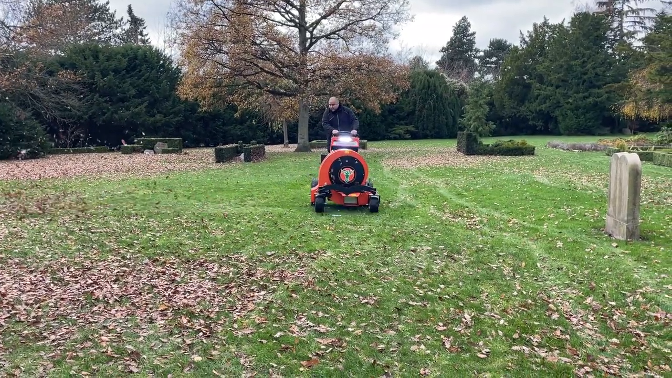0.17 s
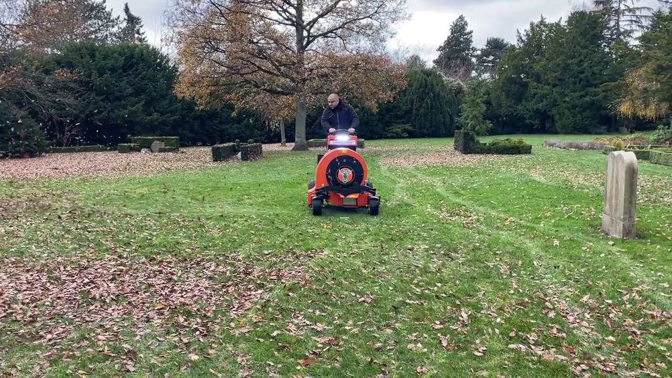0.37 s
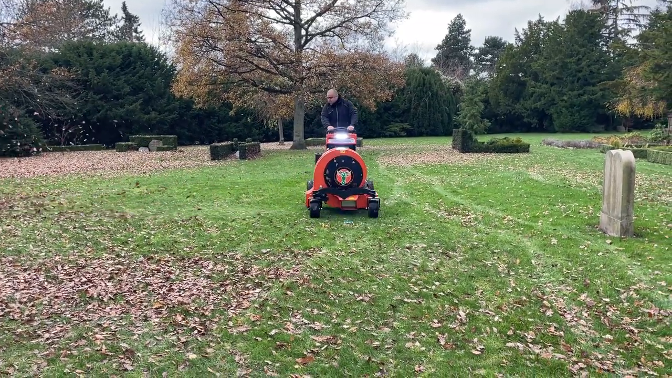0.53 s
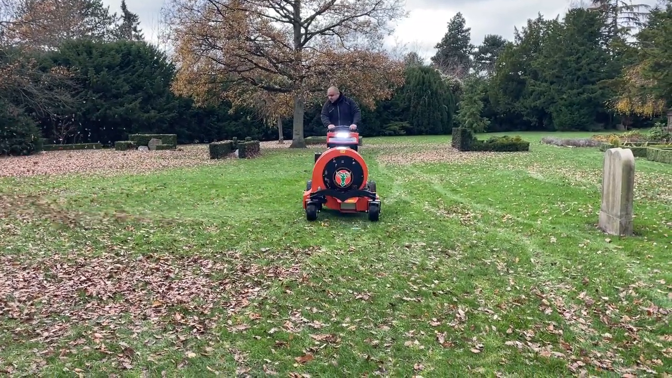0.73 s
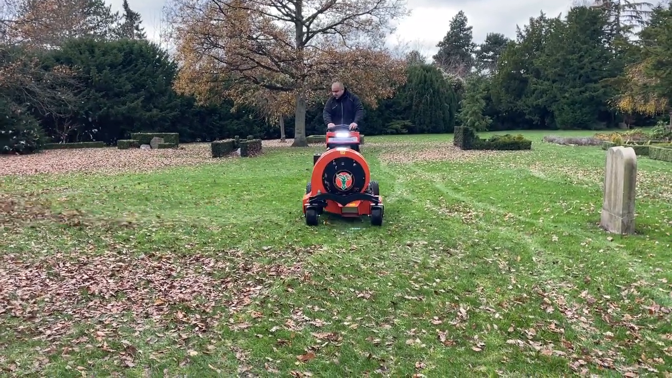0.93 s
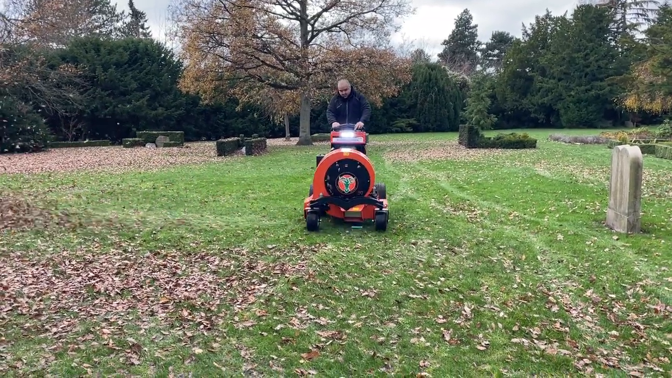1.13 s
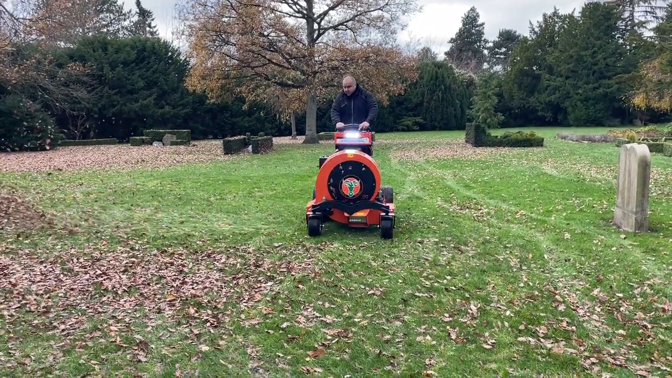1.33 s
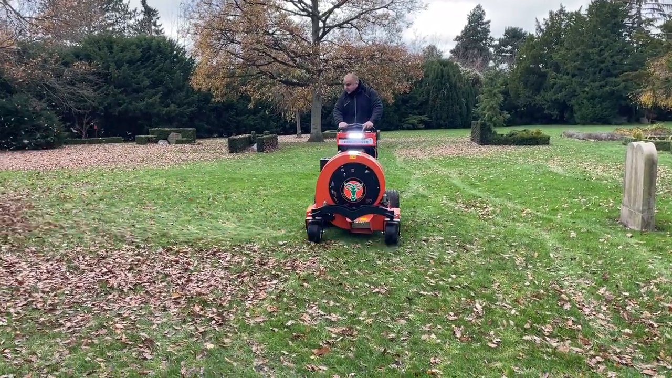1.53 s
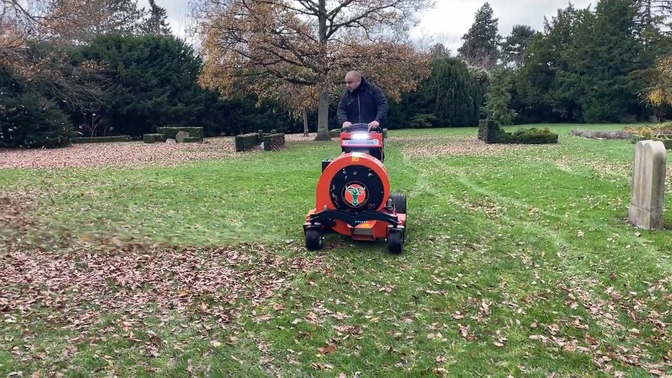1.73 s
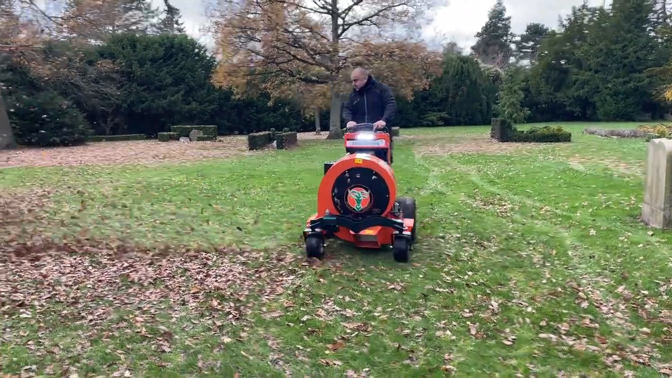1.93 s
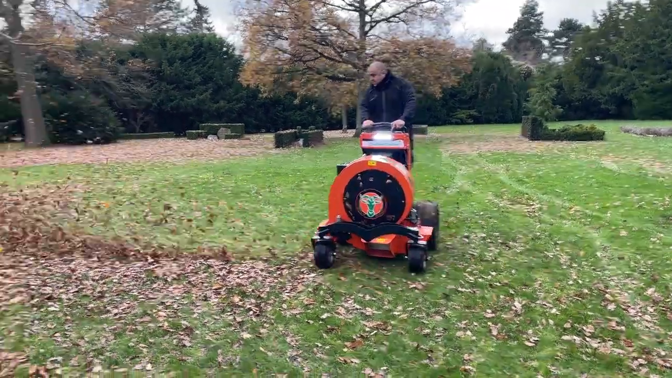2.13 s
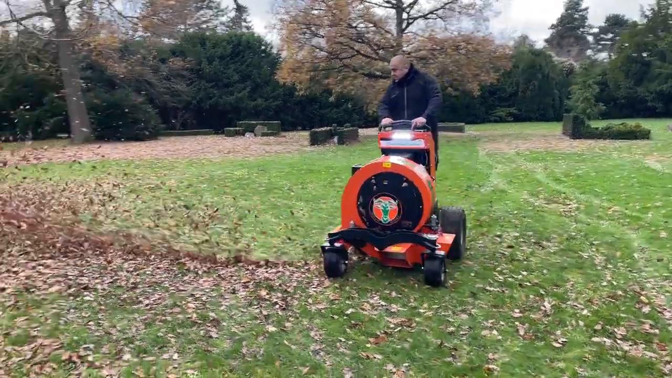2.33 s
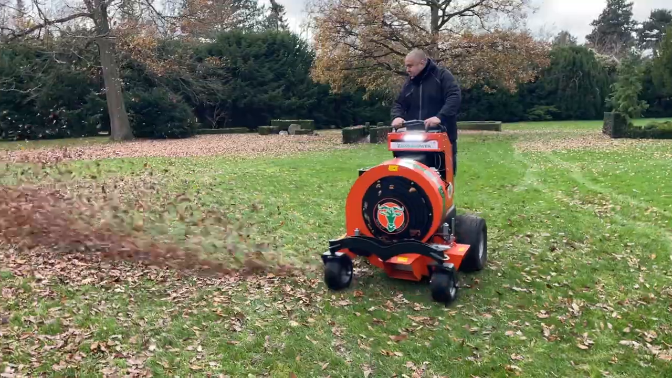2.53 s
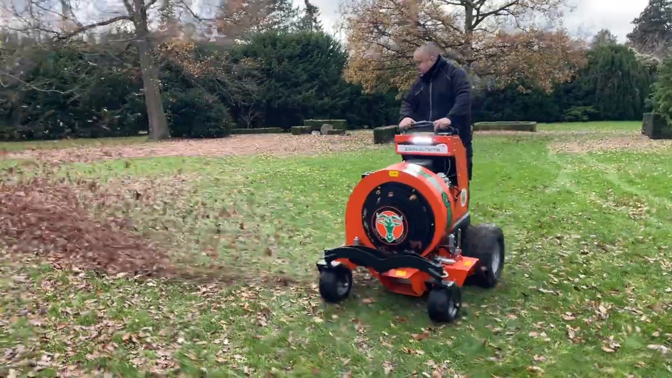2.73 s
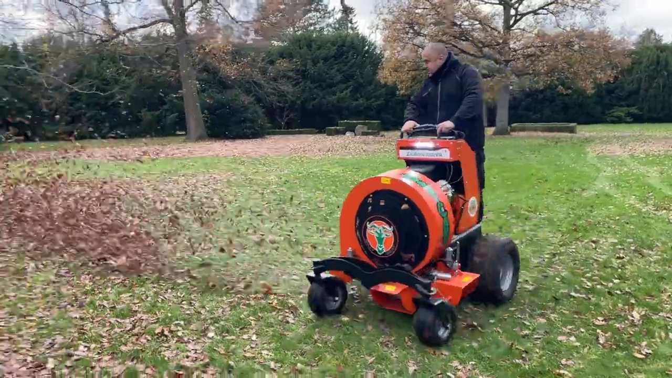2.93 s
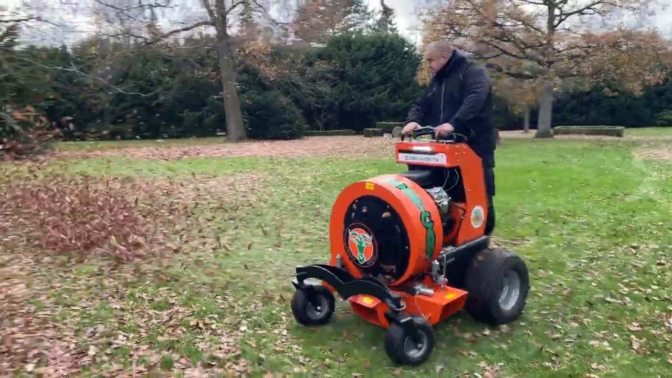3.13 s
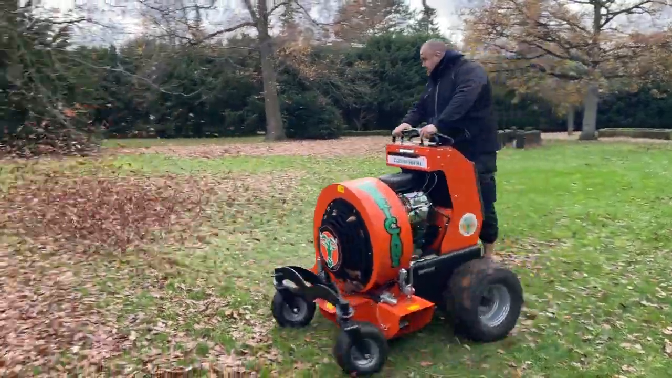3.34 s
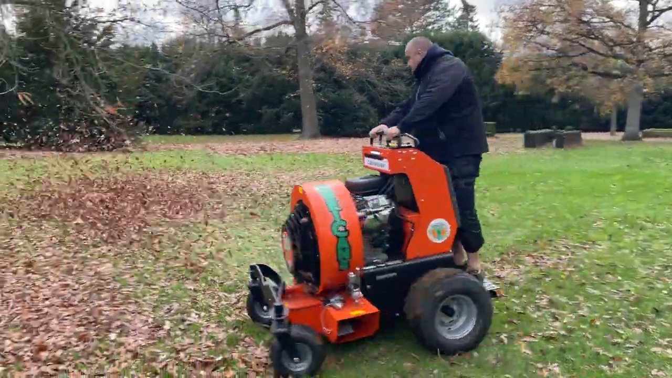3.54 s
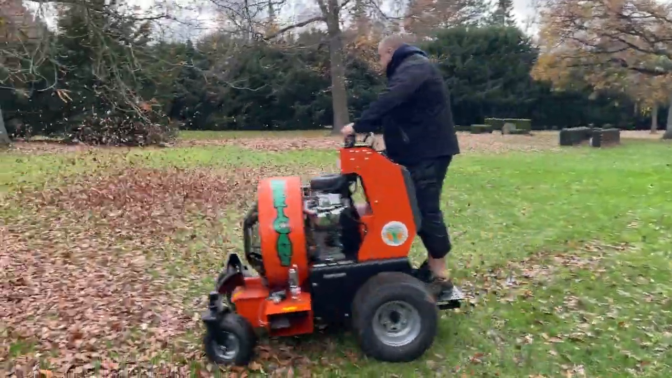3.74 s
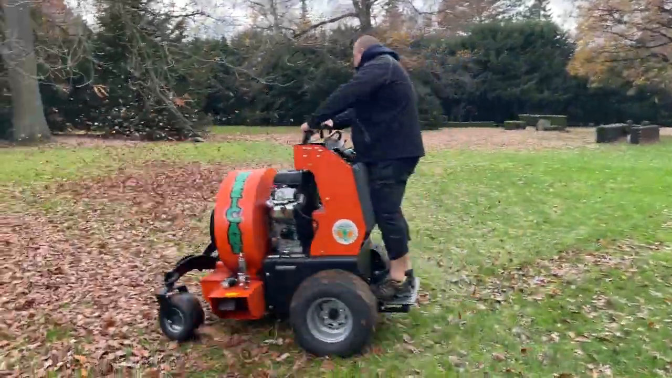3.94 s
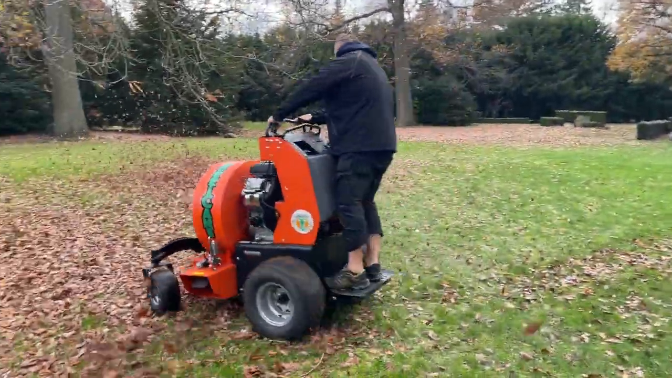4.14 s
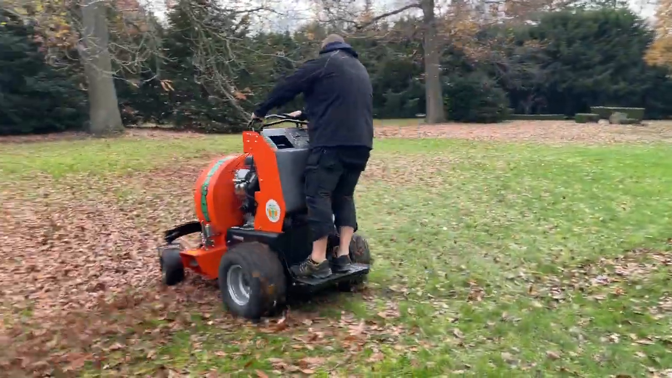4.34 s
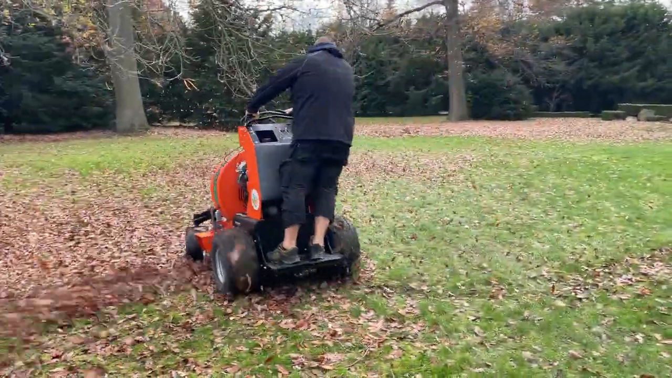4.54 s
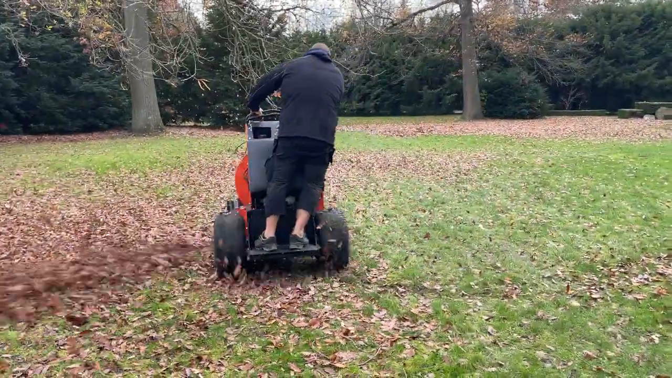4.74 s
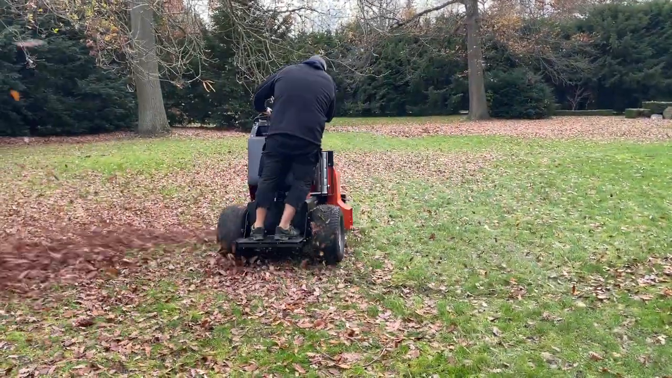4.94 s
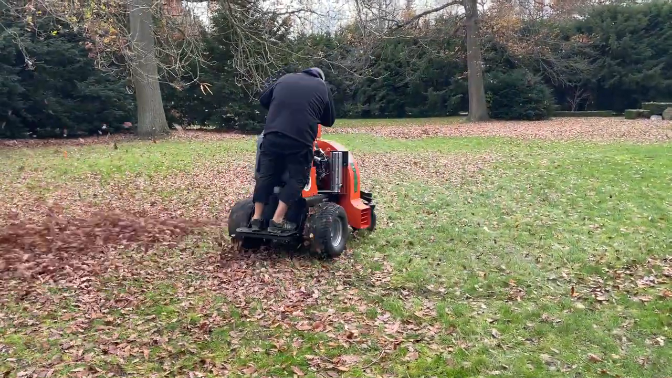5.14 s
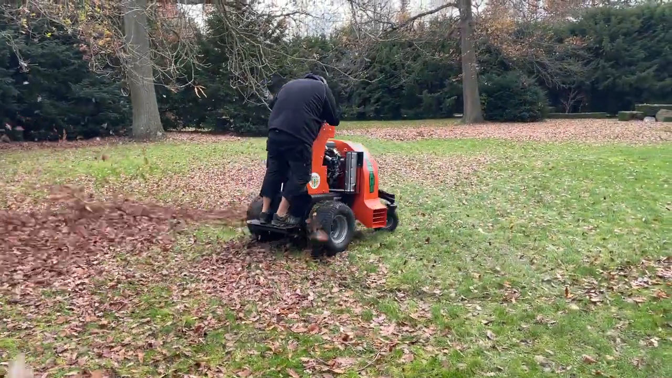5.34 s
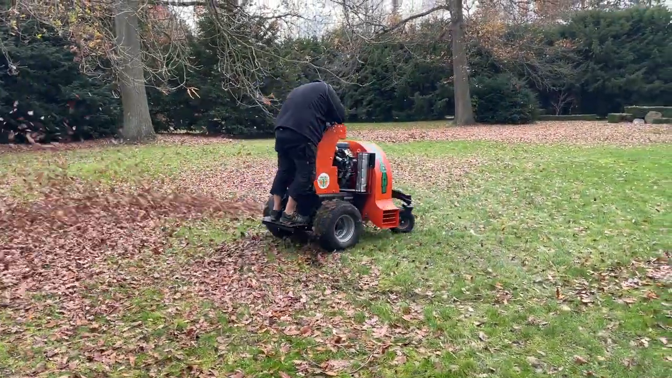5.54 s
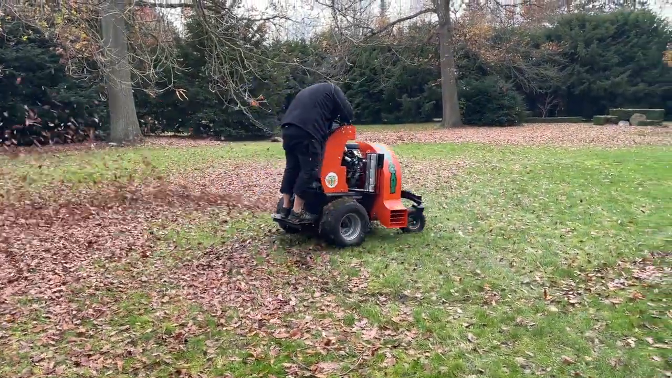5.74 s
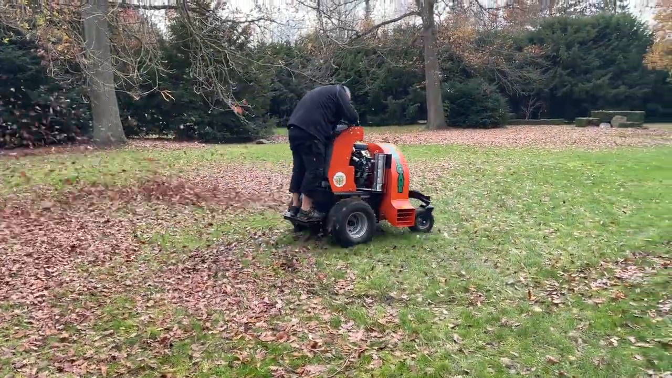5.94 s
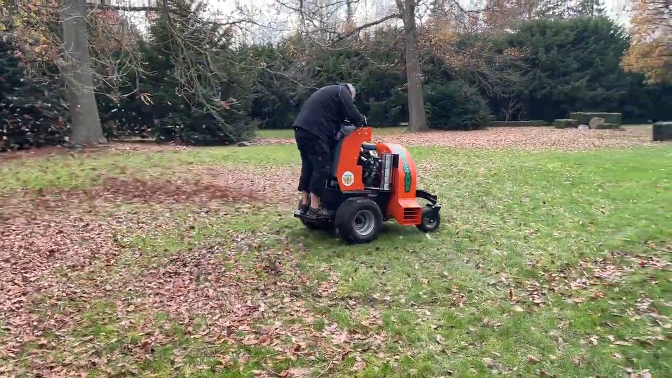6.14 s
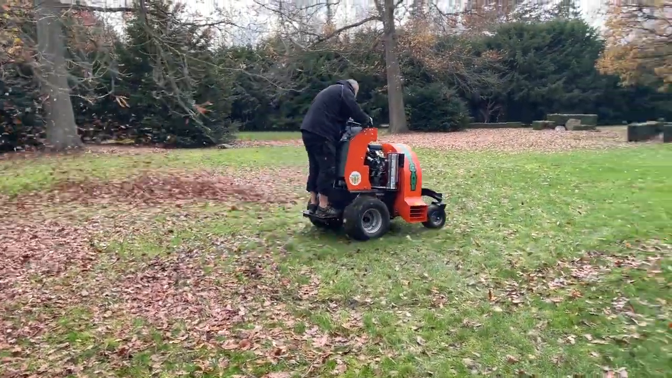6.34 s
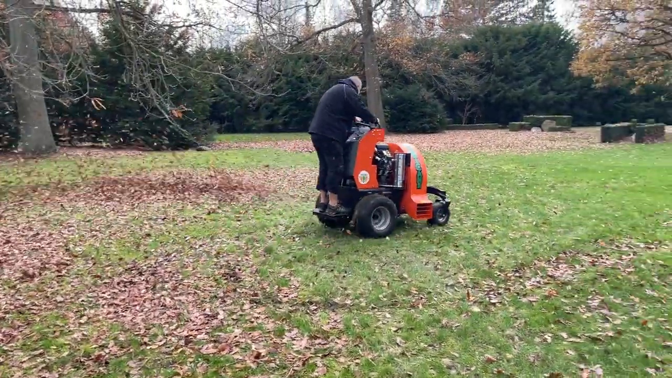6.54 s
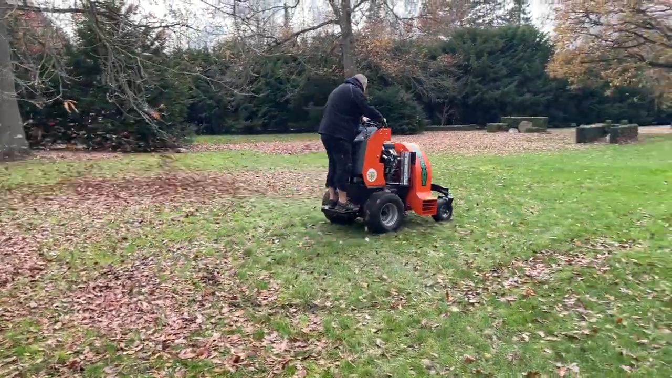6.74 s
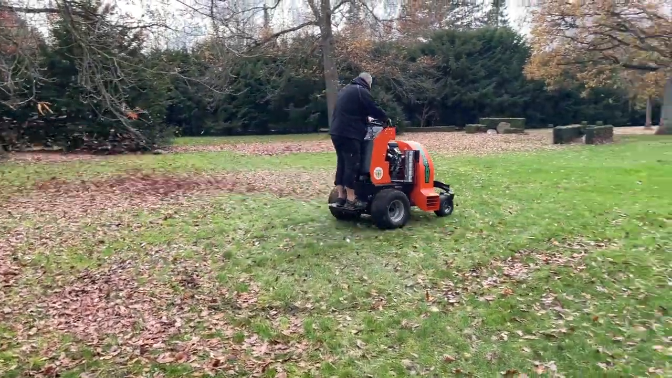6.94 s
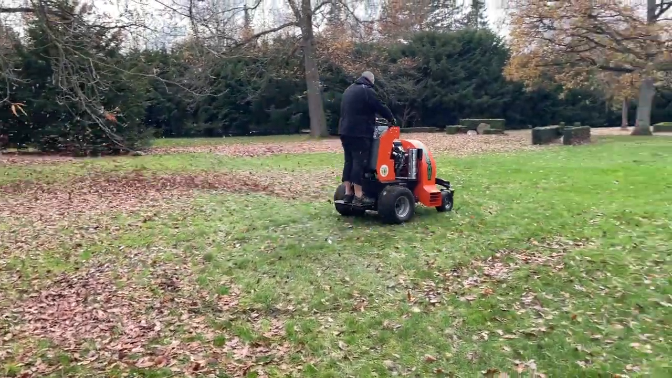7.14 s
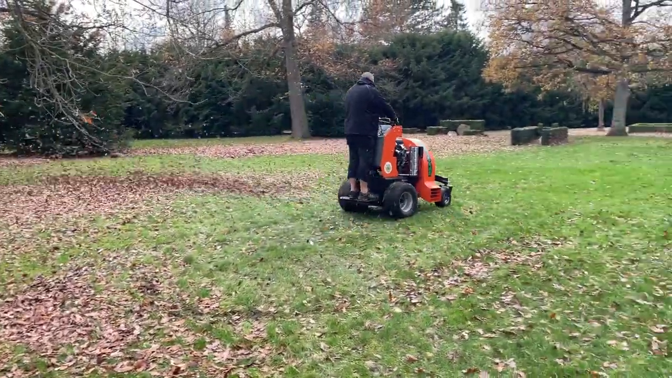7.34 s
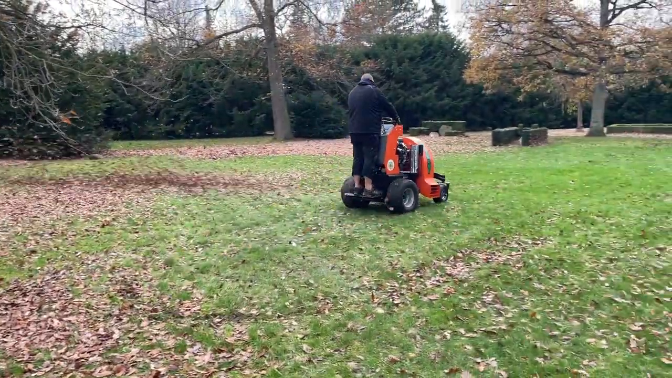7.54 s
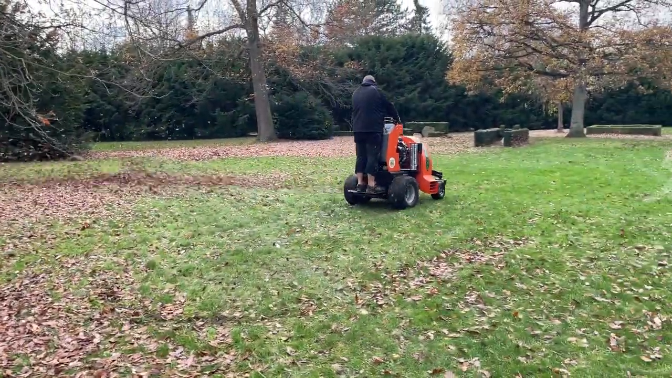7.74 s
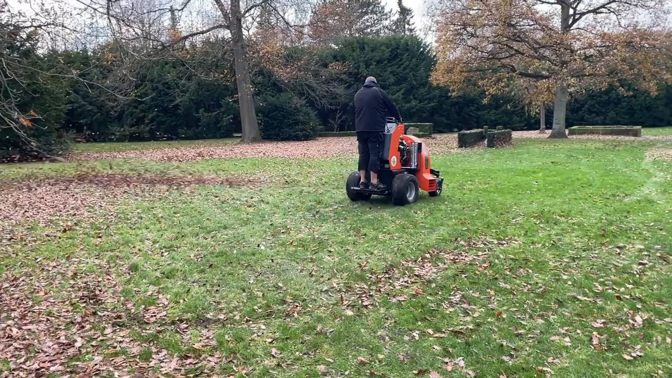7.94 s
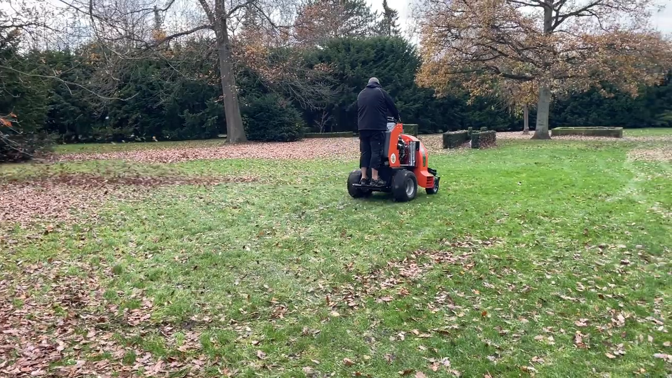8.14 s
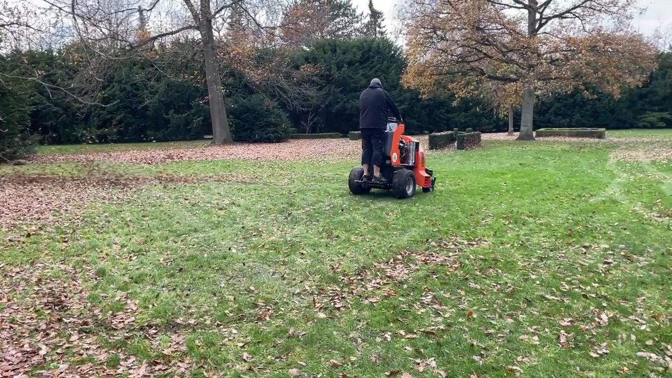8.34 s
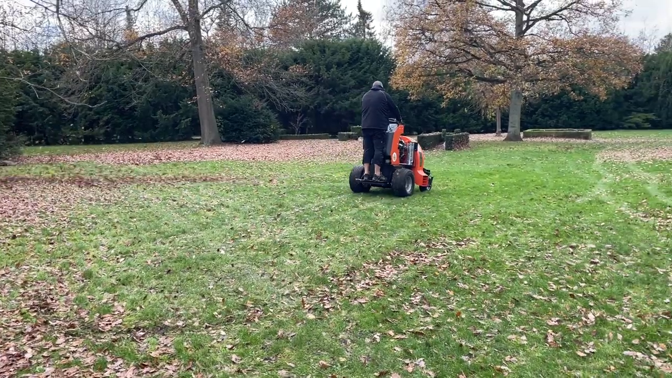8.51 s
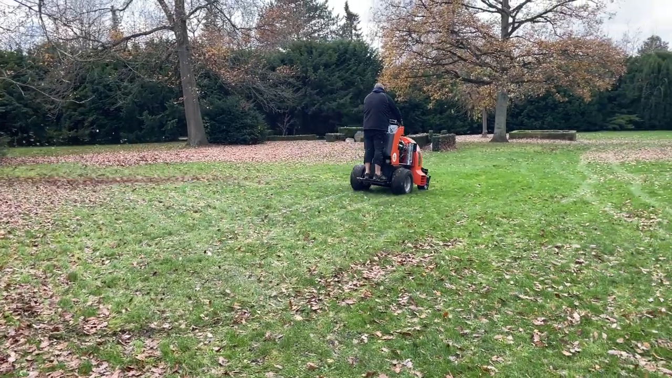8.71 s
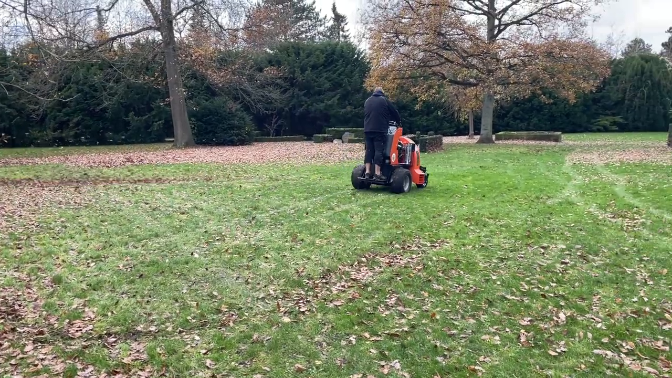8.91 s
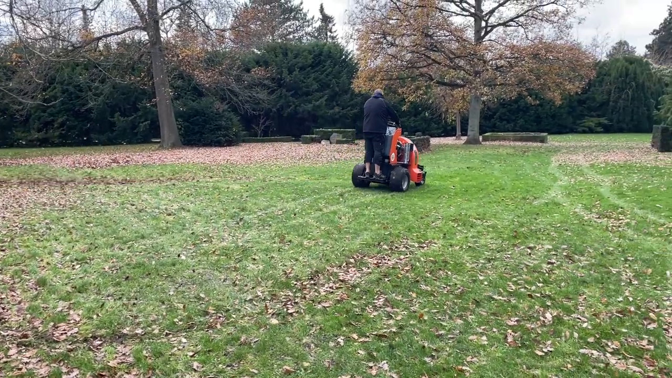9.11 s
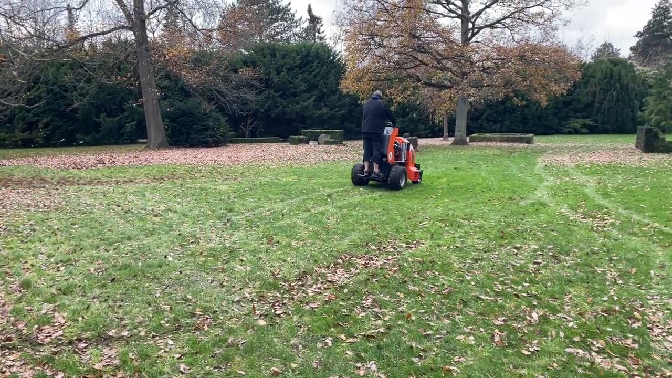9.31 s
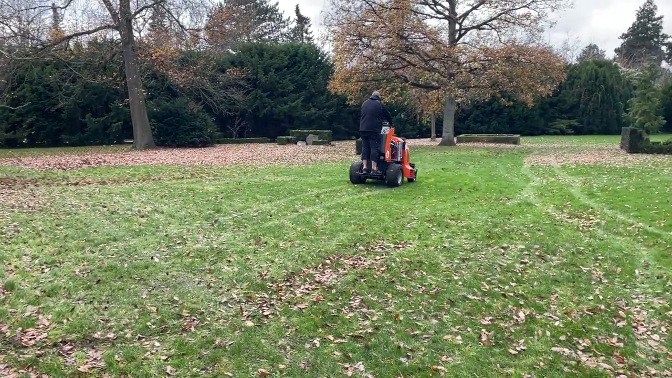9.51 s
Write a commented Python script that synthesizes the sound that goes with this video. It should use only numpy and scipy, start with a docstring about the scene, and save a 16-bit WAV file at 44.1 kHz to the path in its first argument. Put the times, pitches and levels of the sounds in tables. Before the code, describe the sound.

A two-cylinder engine and large fan run continuously. First comes a dense, loud intake rush with faint whistling and mechanical clatter, then a strong tonal hum around three seconds as the machine swings past nearby. The blast drops, and from behind the sound becomes drier, puttering and raspy, slowly receding. Dry leaf rustle and faint low wind gusts sit beneath, heard from a few metres away on an open lawn in stereo.

```python
"""On a lawn, a stand-on leaf blower with a two-cylinder petrol engine comes near, turns and drives off.
From the front, shaped noise makes the fan intake roar over clacking valve gear; side-on, the blade tone
(a sum of cosines) swells while the engine sags. From behind, the exhaust chops the noise into spits and
knocks the tailpipe twice per engine cycle. Ringing filters make narrow bands of noise, whistling or dull;
tiny ticks make blown leaves rustle, and low noise makes a little wind at the microphone."""
import sys
import numpy as np
from scipy import signal
from scipy.fft import rfft, irfft, next_fast_len
from scipy.io import wavfile

SR = 44100
rng = np.random.default_rng(int(sys.argv[2]) if len(sys.argv) > 2 else 0)


def dump(signal):
    """Clip the signal to [-1, 1] and save it as 16-bit WAV at the path in sys.argv[1]."""
    limited = np.clip(np.atleast_2d(signal).T, -1, 1)
    pcm = np.round(limited * 32767).astype(np.int16)
    wavfile.write(sys.argv[1], SR, pcm)


N = 426447
TIME = np.arange(N) / SR
SIZE = next_fast_len(N)
HZ = np.maximum(np.arange(SIZE // 2 + 1) * SR / SIZE, 1)


def from_db(db):
    """Decibels to gain."""
    return np.exp(np.asarray(db) * (np.log(10) / 20))


def rms_one(x):
    """Scale to an average strength (rms) of 1."""
    return x / np.sqrt(np.mean(x ** 2) + 1e-20)


def in_time(rows):
    """Draw each column of a time table as a curve, sample by sample."""
    seconds, *columns = np.transpose(rows)
    return [np.interp(TIME, seconds, column) for column in columns]


def at_hz(points):
    """Draw a frequency table as a curve over the whole spectrum."""
    hz, value = np.transpose(points)
    return np.interp(np.log(HZ), np.log(hz), value)


def drift(rate_hz):
    """Slow random wandering with spread 1, changing about rate_hz times a second."""
    step = 40  # samples between computed points
    r = np.exp(-2 * np.pi * step * rate_hz / SR)
    settle = 2000  # the filter's start-up is thrown away
    noise = rng.standard_normal(N // step + settle + 2)
    slow = signal.lfilter([1], [1, -2 * r, r * r], noise)[settle:]
    return np.interp(np.arange(N) / step, np.arange(len(slow)), rms_one(slow))


def band_pass(x, order, low_hz, high_hz):
    """Keep only the sound between two frequencies."""
    return signal.sosfilt(signal.butter(order, [low_hz, high_hz], "band", fs=SR, output="sos"), x)


def swell(centre_s, half_s):
    """A smooth rise to 1 and fall, as something sweeps past."""
    return np.exp(-np.minimum(((TIME - centre_s) / half_s) ** 2, 20))


def stretch(start_s, end_s, fade_s=0.28):
    """1 while a sound is heard for a stretch, fading at both ends."""
    return np.clip(np.minimum(TIME - start_s, end_s - TIME) / fade_s + .5, 0, 1)


def panned(x, db):
    """Place a sound between the ears by left minus right dB."""
    return x * from_db(db * np.array([[.5], [-.5]]))


def resonator(hz, width_hz):
    """Filter coefficients of one resonance, gain 1 at its peak."""
    r = np.exp(-np.pi * width_hz / SR)
    return (1 - r * r) / 2 * np.array([1, 0, -1]), [1, -2 * r * np.cos(2 * np.pi * hz / SR), r * r]


def pulse_ages(cycles, moment, db, uneven_db):
    """Time since the latest pulse [engine cycles] and its strength, which differs from pulse to pulse."""
    count, age = np.divmod(cycles - moment + 1, 1)
    chance = np.clip(rng.standard_normal(int(count[-1]) + 1), -2, 2)
    return age, from_db(db + uneven_db * chance)[count.astype(int)]


# Shared strength of the air noise and parts tied to it: (time [s], level [dB])
AIR_STRENGTH = [(0, -24), (1.9, -23.5), (2.35, -22.5), (2.95, -22.5), (3.2, -26), (3.55, -26),
                (3.75, -30.5), (4.1, -29), (4.6, -34.5), (5.0, -30), (6.7, -30.5), (7.8, -32.5),
                (9.67, -35.5)]
# How far away the machine is: (time [s], distance [m])
DISTANCE = [(0, 9.1), (2, 7.8), (3.2, 4.2), (4.2, 3.3), (5.5, 5), (6.7, 4.9), (9.67, 17)]
NEAR_M = 3  # distance from which doublings are counted
# The driver passes between the engine and us: (time [s], half length [s])
DRIVER_SHADOW = (4.47, 0.94)
# How each part stands to the shared strength: (from the front [dB], from behind [dB],
# change per doubling of distance [dB], change in the driver's shadow [dB])
ASPECT = { "rumble": (1.5, -0.5, 3.5, 1.7), "rush": (1.04, -0.84, 0.25, -2), "roar": (0.5, 0.46, 0, -6.5),
          "hiss": (-7.5, -5, 1.21, -6), "sizzle": (-20, -13.5, 1, -9), "valve gear": (-19.5, -15, 0, -6),
          "third harmonic": (-6.5, -11, -2, -6), "fourth harmonic": (-15.5, -16, -2, -11)}


def heard_db(part, behind):
    """Level of one part, set by heading, distance and the driver's shadow."""
    front_db, rear_db, doubling_db, shadow_db = ASPECT[part]
    heading_db = front_db + (rear_db - front_db) * behind
    doublings = np.log2(in_time(DISTANCE)[0] / NEAR_M)
    shadow = shadow_db * swell(*DRIVER_SHADOW)
    return in_time(AIR_STRENGTH)[0] + heading_db + doubling_db * doublings + shadow


# Gusts on the microphone: (time [s], level [dB])
WIND = [(0, -53), (4.58, -51), (4.68, -26), (4.8, -37), (8.2, -47), (8.35, -28), (8.9, -32), (9.3, -35),
        (9.66, -34)]


def wind(low_hz=62, high_hz=130, lumpy_db=3):
    """Gusts buffet the microphone in low lumps."""
    rumble = band_pass(rng.standard_normal(N), 3, low_hz, high_hz)
    lumpy = rms_one(rumble * from_db(lumpy_db * drift(5.8)))
    return from_db(in_time(WIND)[0]) * lumpy


# Dry leaves tumbling past in the jet: (time [s], level [dB])
LEAVES = [(0, -60), (1.8, -47), (2.45, -41.5), (3.3, -59), (4.0, -49.5), (4.55, -50), (4.8, -46.5),
          (5.2, -44.5), (6.0, -63), (9.67, -68)]
# One brief swish among the leaves: (time [s], length [s], level [dB])
SWISH = (3.69, .008, -44)


def leaves(per_s=9000, size_db=2.5, low_hz=5800, high_hz=12000):
    """Thousands of tiny dry leaf contacts merge into a thin rustle."""
    hits = rng.random(N) < per_s / SR
    sizes = from_db(size_db * rng.exponential(1, N))
    ticks = hits * rng.choice([-1, 1], N) * sizes
    rustle = rms_one(band_pass(ticks, 2, low_hz, high_hz))
    swish_s, length_s, swish_db = SWISH
    swish = from_db(swish_db) * np.exp(-((TIME - swish_s) / length_s) ** 2 / 2)
    return rustle * (from_db(in_time(LEAVES)[0]) + swish)


# The valve gear clacks twice a cycle: (moment in the cycle [0-1], strength [dB])
TAPPETS = [(.235, -1), (.86, -2)]


def valve_gear(cycles, behind, low_hz=3200, high_hz=6500, ring_cycles=0.069, uneven_db=1.5):
    """Rockers clack under the valve covers; each bright clack dies within a small part of the cycle."""
    power = 0
    for moment, db in TAPPETS:
        age, strength = pulse_ages(cycles, moment, db, uneven_db)
        power = power + strength ** 2 * age * np.exp(-2 * age / ring_cycles)
    metal = band_pass(rng.standard_normal(N), 1, low_hz, high_hz)
    return from_db(heard_db("valve gear", behind)) * rms_one(metal * np.sqrt(power))


def buzz(cycles, behind, front_db=-11, rear_db=-7, size=2048):
    """The engine block rattles alike in every cycle: a comb of high orders riding on the rush."""
    orders = np.arange(25, 52)  # multiples of the engine cycle
    comb = np.zeros(size // 2 + 1, complex)
    comb[orders] = (rng.standard_normal(len(orders)) + 1j * rng.standard_normal(len(orders))) / orders
    one_cycle = rms_one(irfft(comb))
    rattle = np.interp(cycles * size, np.arange(size), one_cycle, period=size)
    return rattle * from_db(heard_db("rush", behind) + front_db + (rear_db - front_db) * behind)


# Narrow bands of noise, whistling or dull, each heard for a stretch: (from [s], to [s], frequency [Hz],
# width [Hz], level [dB], share that pulses with the exhaust spits [0-1])
NOISE_BANDS = [ (-0.17, 2.4, 1930, 170, -32, 0.16), (0.802, 1.5, 1964, 60, -36.5, 0.16),
               (2.0, 2.55, 2075, 120, -28.5, 0.1), (2.0, 3.1, 1880, 130, -35, 0.1),
               (2.6, 3.05, 1660, 70, -29, 0.1), (3.3, 4.5, 1520, 180, -42, 0),
               (2.15, 2.94, 2860, 400, -33.5, 0.1), (3.0, 3.6, 2660, 200, -39, 0),
               (4, 6.9, 672, 80, -38.5, 0.3), (4.25, 5.45, 1955, 28, -47.5, 0),
               (7.2, 8.05, 9300, 150, -56, .3), (4.5, 5.4, 640, 40, -41, .2), (-.2, .8, 1150, 200, -35, 0),
               (7.2, 9.8, 385, 70, -38, .2), (6.7, 8.05, 11870, 150, -61, .7)]


def narrow_noise(bursts):
    """Noise, partly pulsing with the exhaust spits, rings in narrow filters: whistling or dull bands."""
    out, noise = np.zeros(N), rng.standard_normal(N)
    for start, end, hz, width, db, share in NOISE_BANDS:
        fade = stretch(start, end)
        on = fade > 0
        drive = noise[on] * np.sqrt(1 - share + share * bursts[on])
        b, a = resonator(hz, width * np.pi / 2)   # wider, as it is passed twice
        ringing = signal.lfilter(b, a, signal.lfilter(b, a, drive))
        out[on] += from_db(db) * fade[on] * rms_one(ringing)
    return out


# The two cylinders fire: (moment in the cycle [0-1], strength [dB])
FIRINGS = [(0.158, 6.5), (.783, 4)]
# Ringing tones of the tailpipe, each beamed our way for a stretch:
# (from [s], to [s], pitch [Hz], level before the clatter curve [dB])
KNOCK_MODES = [ (4.83, 7, 4340, -46), (5.1, 5.66, 4600, -51), (7.23, 7.75, 4430, -44.5),
               (7.2, 8.04, 4900, -47), (6.4, 7.8, 3050, -44.5), (5.7, 7.0, 2640, -46), (8.9, 11, 4100, -49),
               (8.6, 9.8, 5070, -49), (9.3, 9.4, 2490, -43.5), (8.86, 9.4, 2830, -48),
               (7.7, 8.6, 2540, -51), (7.9, 8.6, 5000, -55), (7.4, 7.9, 5900, -54), (4.7, 9.8, 6600, -57),
               (6.2, 8.5, 1414, -43.5)]
# How hard the tailpipe knocks reach us: (time [s], level change [dB])
CLATTER = [(4.9, -2), (5.4, 2), (5.8, -5), (6.3, -0.5), (7.05, -2), (7.5, 3), (8.0, -.5), (8.5, -1.5),
           (9.1, 2), (9.67, -4)]


def knocks(cycles, ring_s=0.0011, lead_s=0.001204, stray_s=.0007, uneven_db=3.0, pitch_scatter=.022, size=512):
    """Each exhaust valve knocks the tailpipe just ahead of its blowdown; modes die within milliseconds."""
    firings = [(count + moment, db) for count in range(int(cycles[-1]) - 1) for moment, db in FIRINGS]
    moments, firing_db = np.transpose(firings)
    starts = np.searchsorted(cycles, moments)[:, None] - lead_s * SR
    age, out = np.arange(size) / SR, 0
    for start, end, hz, db in KNOCK_MODES:
        strength, detune, phase, stray = rng.standard_normal((len(moments), 4)).T[:, :, None]
        first = np.maximum(starts + stray_s * SR * stray, 0).astype(int)
        places = first + np.arange(size)
        envelope = (age / ring_s) ** 2 * np.exp(-age / ring_s)
        pitch_hz = hz * (1 + pitch_scatter * detune)
        rings = envelope * np.sin(2 * np.pi * (pitch_hz * age + phase))
        rings = rings * from_db(firing_db[:, None] + uneven_db * np.clip(strength, -2, 1))
        train = np.bincount(places.ravel(), rings.ravel(), N)[:N]  # overlapping rings add up
        out = out + from_db(db) * stretch(start, end) * rms_one(train)
    return out * from_db(in_time(CLATTER)[0])


RISE, FALL, TAIL = .025, .034, .22  # one blowdown: rise, fall, silencer tail [engine cycles]


def spits(cycles, uneven_db=1.4):
    """A valve opens fast, gas blows down, the silencer rings on: power of bursts and tails, each mean 1."""
    blowdown = tail = 0
    for moment, db in FIRINGS:
        age, strength = pulse_ages(cycles, moment, db, uneven_db)
        opening = strength ** 2 * (1 - np.exp(-(age / RISE) ** 2))
        blowdown = blowdown + opening * np.exp(-age / FALL)
        tail = tail + opening * np.exp(-age / TAIL)
    return blowdown / blowdown.mean(), tail / tail.mean()


# Edges of rumble, rush, roar, hiss and sizzle: (frequency [Hz])
AIR_EDGES_HZ = [15, 480, 1000, 2400, 7500, 20000]
# How alike the air noise is left and right: (frequency [Hz], likeness [0-1])
LIKENESS = [(60, .995), (250, .99), (500, .97), (1000, .955), (2000, .95), (4000, .9), (13000, .9)]


def air_bands(colour, resonances):
    """Stereo turbulence coloured by a casing, split into five bands, each rms 1."""
    level_db = at_hz(colour)
    for hz, width, db in resonances:
        level_db = level_db + db / (1 + (2 * (HZ - hz) / width) ** 2)
    alike = np.clip(at_hz(LIKENESS), 0, 1)
    mid, side = rfft(rng.standard_normal((2, SIZE)))
    pair = from_db(level_db) * (np.sqrt(1 + alike) * mid + np.sqrt(1 - alike) * side * [[1], [-1]])
    bands = []
    for low, high in zip(AIR_EDGES_HZ, AIR_EDGES_HZ[1:]):
        inside = (HZ >= low) & (HZ < high)
        bands.append(rms_one(irfft(pair * inside, SIZE)[:, :N]))
    return bands


# Colour of the air noise within each band, front and rear: (frequency [Hz], relative level per Hz [dB])
FRONT_COLOUR = [(25, -29), (65, -10), (140, 0), (400, -5.5), (550, -6), (750, -7), (1250, -13.5),
                (1600, -12), (2500, -18), (3300, -22), (4700, -26), (6500, -32.5), (8500, -32.5),
                (11000, -32), (14000, -41.5)]
REAR_COLOUR = [(25, -22), (65, -4), (130, -0.5), (360, -1), (500, -7), (900, -9.5), (1380, -9), (1650, -18),
               (2300, -17.5), (3600, -22.5), (5000, -24.5), (8300, -31.5), (10000, -31.5), (12000, -35.5),
               (13500, -40.5)]
# Resonances of the fan housing and of the silencer: (frequency [Hz], width [Hz], lift [dB])
HOUSING = [(2556, 81, 4), (1020, 36, 0.5), (404, 40, 1.5), (2860, 130, -4), (5350, 440, -2)]
SILENCER = [(686, 120, -1.2), (820, 120, 4), (1840, 110, 7.5), (2010, 91, 6.5), (2430, 250, 4.5),
            (3100, 150, 2.2), (5630, 450, -3), (7240, 390, 6), (9170, 400, 8.5)]
# The exhaust's part in each band, from behind, before the tailpipe's aim scales it:
# (share in the blowdown [0-1], share in the silencer's tail [0-1], lead [s])
SPIT_SHARE = { "rumble": (.09, .03, .002), "rush": (0.19, .06, 0.0016), "roar": (.18, .05, 0.00073),
              "hiss": (0.22, .16, .0005), "sizzle": (0.21, 0.49, .001)}
# Place between the ears; the hiss swings left with the jet:
# (time [s], fan tone left minus right [dB], hiss left minus right [dB])
PAN = [(0, 0, 1), (0.8, 1.5, 2.3), (1.9, -1, 2), (2.7, -4, 0), (3.2, 1, 0.5), (3.65, 0.5, 0), (4.05, 0, 5),
       (4.5, 0.5, 6), (5.0, 0, 4.5), (6.3, 0.5, -0.8), (7.0, 0.5, 0), (9.67, 0.5, -1)]


def air(cycles, bursts, tails, behind, pipe, eddy_db=.5, grit_db=-0.05, throb_db=0.8):
    """Intake roar throbs with the engine from the front; from behind, exhaust spits chop the rush."""
    out, throb = 0, from_db(throb_db * np.cos(2 * np.pi * cycles))
    grit, jet_side = from_db(grit_db * drift(400)), panned(0.99, in_time(PAN)[1])
    fronts, rears = air_bands(FRONT_COLOUR, HOUSING), air_bands(REAR_COLOUR, SILENCER)
    for band, intake, exhaust in zip(SPIT_SHARE, fronts, rears):
        burst_share, tail_share, lead_s = SPIT_SHARE[band]
        chop = burst_share * (bursts - 1) + tail_share * (tails - 1)
        power = np.roll(np.maximum(1 + pipe * chop, .1), -int(lead_s * SR))
        chopped = exhaust * np.sqrt(behind * power) * grit
        drawn = intake * np.sqrt(1 - behind)
        if band in ("rumble", "rush"):
            drawn = drawn * throb
        blast = from_db(heard_db(band, behind) + eddy_db * drift(9.8)) * (drawn + chopped)
        out = out + (blast * jet_side if band in ("hiss", "sizzle") else blast)
    return out


def cancel(x, dip, relative_width, size=2048):
    """A reflection cancels one band, which moves over time."""
    hz, depth = in_time(dip)
    out, state = x.copy(), np.zeros((2, 2))
    for i in range(0, N, size):
        coefficients = resonator(hz[i], relative_width * hz[i])
        band, state = signal.lfilter(*coefficients, x[:, i:i + size], zi=state)
        out[:, i:i + size] -= depth[i:i + size] * band
    return out


# Exhaust drone without the beamed orders: (time [s], level [dB])
DRONE = [(0, -15), (2.0, -18.5), (2.6, -19), (3.0, -23.5), (3.25, -29.5), (3.6, -33), (4.0, -31.5),
         (4.5, -28.5), (5.0, -27.5), (6.2, -23.5), (8.0, -25), (9.0, -29), (9.67, -26)]
# Balance among the drone's orders: (multiple of the four-stroke cycle, relative level from the front [dB],
# side-on [dB], from behind [dB])
ORDERS_DB = [(2, -39.5, -53, -48.5), (3, -26, -43, -34.5), (4, -46, -56, -58), (5, -22, -32.5, -28.5),
             (6, -24.5, -46, -31), (7, -32, -52, -41.5), (8, -23, -50, -39.5), (9, -33, -48, -42),
             (10, -46, -37, -39.5), (11, -34.5, -44, -39), (13, -31, -45, -33.5), (14, -37, -52, -50),
             (15, -33, -56, -45), (16, -52, -54, -42.5), (17, -46, -56, -44.5), (18, -41, -58, -46),
             (19, -44, -58, -46), (20, -48, -62, -45), (21, -42, -60, -54), (22, -41, -50, -60),
             (23, -45, -58, -47), (27, -54, -60, -58), (34, -54, -60, -62)]
# The machine is seen side-on: (time [s], half length [s])
SIDE_ON = (4.03, 0.69)
# Single orders beamed our way as the machine turns:
# (multiple of the cycle, time [s], half length [s], level [dB])
ORDER_LOBES = [(8, .4, .4, -24), (8, 2.7, .32, -24.5), (8, 4.9, .3, -36), (8, 5.8, .6, -42),
               (20, 2.45, .42, -33), (27, 3.6, 1.0, -47), (34, 2.9, .25, -37), (34, 4.4, 1.0, -46)]


def drone(cycles, behind, uneven_db=0.5, wander_rad=0.078, smear_rad=0.86):
    """The two cylinders' pulses, smeared by the silencer into a stack of orders whose level wavers."""
    side, sway = swell(*SIDE_ON), wander_rad * drift(1.4)
    powers = []
    for _, front, beside, rear in ORDERS_DB:
        along = front + (rear - front) * behind
        powers.append(from_db((1 - side) * along + side * beside) ** 2)
    scale = from_db(in_time(DRONE)[0] + uneven_db * drift(7.1)) ** 2 / sum(powers)
    out = 0
    for (order, *_), power in zip(ORDERS_DB, powers):
        beamed = sum((from_db(db) * swell(s, half_s)) ** 2 for k, s, half_s, db in ORDER_LOBES if k == order)
        # the firing moments set where each order's wave starts
        pulses = sum(from_db(db) * np.exp(-2j * np.pi * order * moment) for moment, db in FIRINGS)
        phase = np.angle(pulses) + smear_rad * rng.normal()
        wave = np.cos(2 * np.pi * order * cycles + phase + sway * rng.normal())
        out = out + np.sqrt(2 * (power * scale + beamed)) * wave
    return out


BLADES = 6
# Fan tone at the blade rate, loudest as the outlet swings past: (time [s], level [dB])
FAN = [(0, -37), (1.1, -23), (1.9, -21), (2.3, -17), (2.7, -18.5), (2.98, -9), (3.52, -6.5), (4.0, -15),
       (4.55, -20.5), (5.5, -18), (6.1, -22), (7.0, -17.5), (9.3, -18), (9.67, -20.5)]
# Overtones beamed in lobes that sweep past us, by harmonic: (time [s], half length [s], level [dB])
LOBES = { 2: [(0.998, 1.56, -23.5), (3.089, 0.16, -18.5), (3.48, 0.29, -25), (5.262, 0.41, -34),
         (7.598, 1.03, -32.5), (9.2, 0.82, -34.5)], 3: [(2.2, 0.67, -45), (3.8, 0.24, -46.5),
         (4.9, 0.28, -45), (5.55, 0.38, -43), (7.6, 1, -50)]}


def fan_tone(cycles, behind, flutter_db=.5, intake_flutter_db=.5, shake_rad=0.034):
    """Blades pass the outlet lip; eddies drawn into the intake make the tone flutter, its overtones more."""
    blade = 2 * np.pi * 2 * BLADES * cycles + shake_rad * drift(10)  # two turns per cycle
    flutter = flutter_db + intake_flutter_db * (1 - behind)
    second, third = [sum(from_db(db) * swell(s, half_s) for s, half_s, db in lobes) for lobes in LOBES.values()]
    third = third + from_db(heard_db("third harmonic", behind))
    fourth = from_db(heard_db("fourth harmonic", behind))
    out = 0
    for k, gain in enumerate([from_db(in_time(FAN)[0]), second, third, fourth], 1):
        out = out + np.sqrt(2) * gain * from_db(k * flutter * drift(16.4)) * np.cos(k * blade)
    return out


# Engine speed, sagging under the turn and overshooting after it: (time [s], speed [revolutions per minute])
SPEED = [(0.0, 2359.5), (0.5, 2397.1), (1.0, 2378.3), (1.45, 2406.8), (3.15, 2381.4), (3.55, 2311.0),
         (4.2, 2264.8), (5.2, 2310.1), (5.6, 2398.7), (6.45, 2352.5), (8.55, 2355.3), (9.2, 2382.9),
         (9.67, 2367.2)]
# Heading: (time [s], 0 = intake faces us .. 1 = exhaust faces us, how openly the tailpipe points at us [factor])
HEADING = [(0, 0.0053, .5), (2.9, 0.079, .5), (3.6, 0.098, .3), (4.6, 0.77, 0.55), (5.0, 1, 1.7),
           (5.5, 0.96, 1.3), (6.2, 0.94, 0.86), (7.0, 0.92, 0.72), (7.5, 1, 1.1), (8.2, 1, 1.28),
           (9.67, 1, 1.44)]
# The soft lawn cancels a band that climbs as the machine leaves: (time [s], frequency [Hz], depth [0-1])
GROUND_DIP = [(0, 450, 0), (3.6, 447, 0.02), (4.6, 440, 0.23), (6.0, 530, 0.56), (7.5, 620, 0.3),
              (8.5, 890, 0.45), (9.67, 970, 0.5)]
# Reflections off the casing cancel two narrow bands that shift as it turns:
# two lists of (time [s], frequency [Hz], depth [0-1])
CASING_DIPS = [
    [(0, 1550, 0.55), (1.8, 1590, 0.46), (2.3, 1760, 0.8), (3.6, 1750, 0.4), (4.6, 1740, 0.11),
     (5.4, 1640, 0.5), (9.67, 1590, 0)],
    [(0, 3400, .3), (2, 3400, .25), (2.6, 3580, .12), (4, 3500, 0.2), (8, 3430, .12), (8.6, 3400, 0.4),
     (9.67, 3400, 0.35)],
]


def scene(air_db=-0.6):
    """One crankshaft drives the engine and fan sounds: a four-stroke cycle takes two turns."""
    cycles = np.cumsum(in_time(SPEED)[0]) / (2 * 60 * SR)
    behind, pipe = in_time(HEADING)
    behind = np.clip(behind, 0, 1)
    bursts, tails = spits(cycles)
    background = wind() + leaves()
    details = valve_gear(cycles, behind) + knocks(cycles) + narrow_noise(bursts)
    rush = from_db(air_db) * air(cycles, bursts, tails, behind, pipe) + buzz(cycles, behind)
    rush = cancel(rush, GROUND_DIP, relative_width=0.43)
    for dip in CASING_DIPS:
        rush = cancel(rush, dip, relative_width=0.079)
    tones = drone(cycles, behind) + panned(fan_tone(cycles, behind), in_time(PAN)[0])
    return background + details + rush + tones


# Level difference of the microphone pair: (frequency [Hz], left minus right [dB])
TILT = [(60, 1.5), (200, 0.8), (450, 0.9), (660, 0), (1250, -2), (1550, -3), (2050, -3.5), (2650, -1),
        (3200, 0.5), (4400, 0), (5500, 1.8), (6500, -1), (8000, 2), (13000, -2)]
# Phase difference of the pair: (frequency [Hz], lead of the left [radians])
PORT_PHASE = [(60, -0.02), (300, -0.1), (700, -0.31), (1600, -0.23), (3000, 0.8), (3900, 0.21),
              (5500, 0.26), (6800, -1.15), (7800, -2.95), (8700, -3.35), (9500, -4.46), (11100, -6.28),
              (12300, -6.31), (13700, -8.7)]
# A narrow notch in the left port: (frequency [Hz], width [Hz], depth [0-1])
PORT_NOTCH = (1790, 58, 0.47)


def record(dry, low_cut_hz=29, cutoff_hz=13900):
    """Two microphone ports differ in level and phase; peaks are rounded, deep bass and top are cut."""
    half = from_db(at_hz(TILT) / 2) * np.exp(.5j * at_hz(PORT_PHASE))  # half the difference to each side
    hz, width, depth = PORT_NOTCH
    notch = 1 - depth / (1 + 2j * (HZ - hz) / width)
    ports = irfft(rfft(dry, SIZE) * np.array([half * notch, 1 / half]), SIZE)[:, :N]
    ports = signal.sosfilt(signal.butter(4, low_cut_hz, "high", fs=SR, output="sos"), ports)
    rounded = ports / (1 + (ports / .96) ** 12) ** (1 / 12)
    return signal.sosfilt(signal.ellip(10, .1, 80, cutoff_hz, fs=SR, output="sos"), rounded)


dry = scene()
out = record(dry)
dump(out)
```